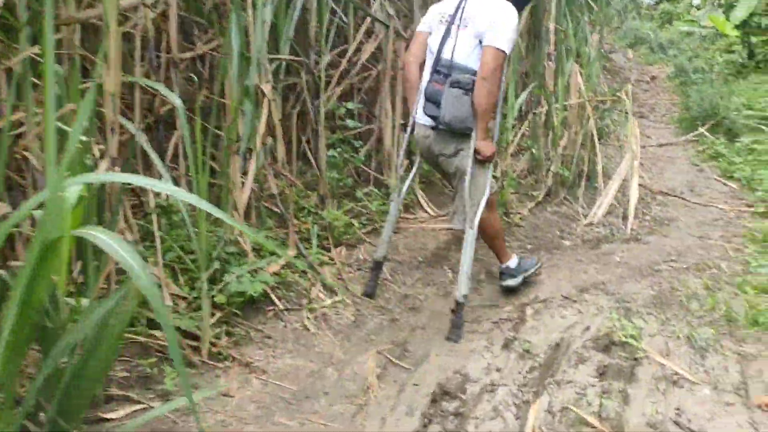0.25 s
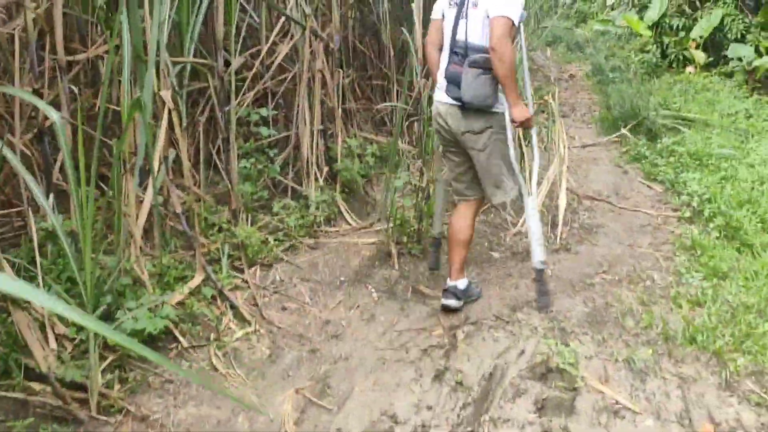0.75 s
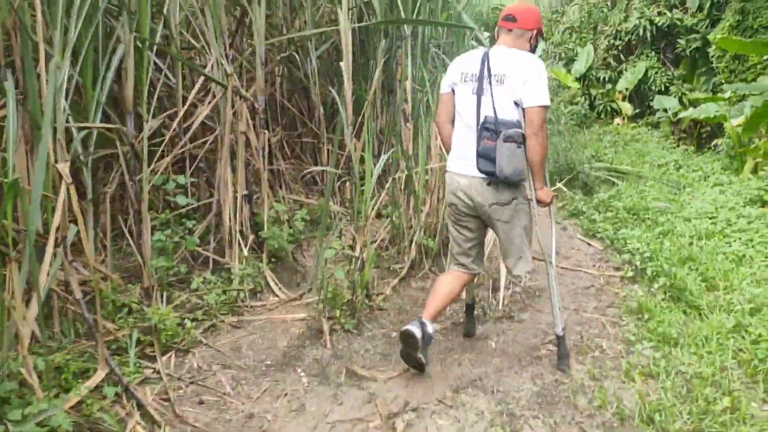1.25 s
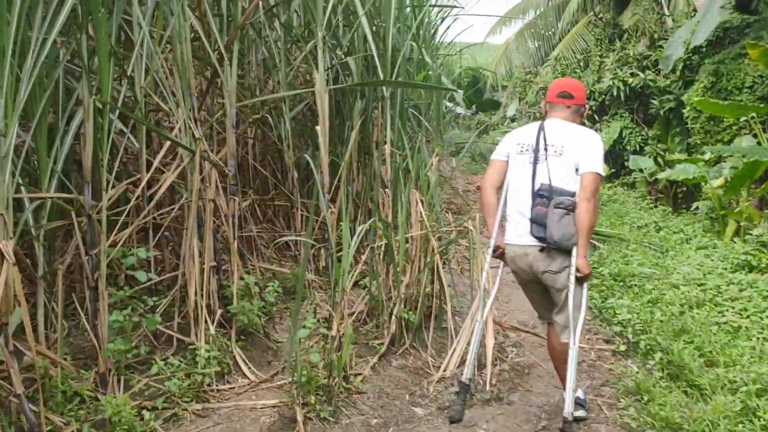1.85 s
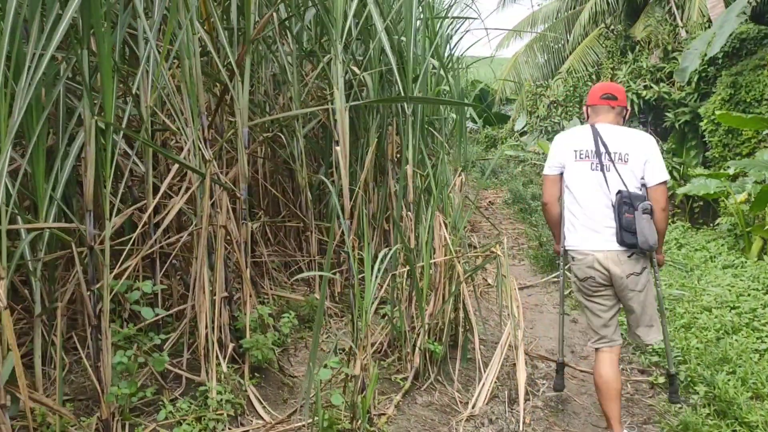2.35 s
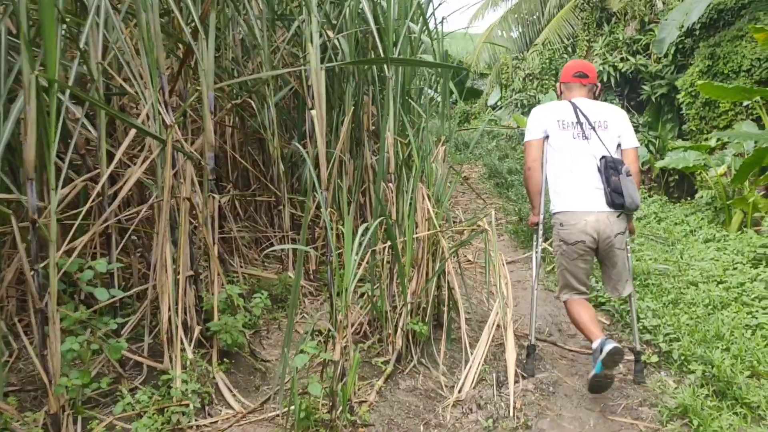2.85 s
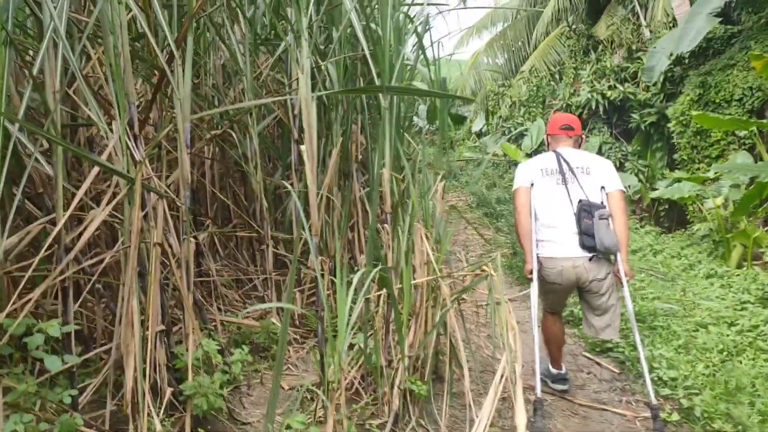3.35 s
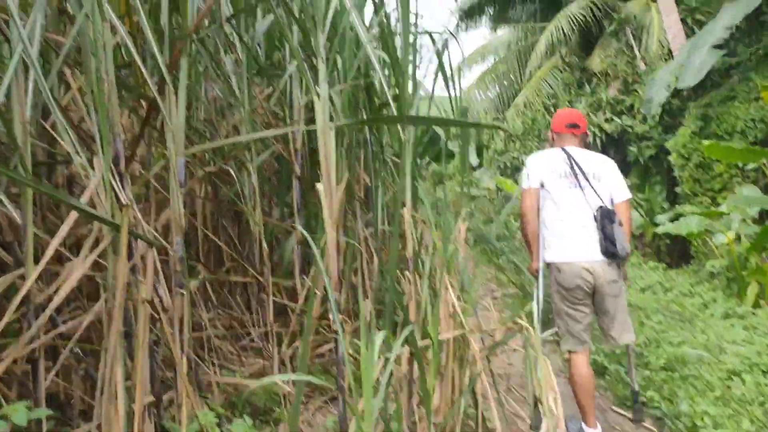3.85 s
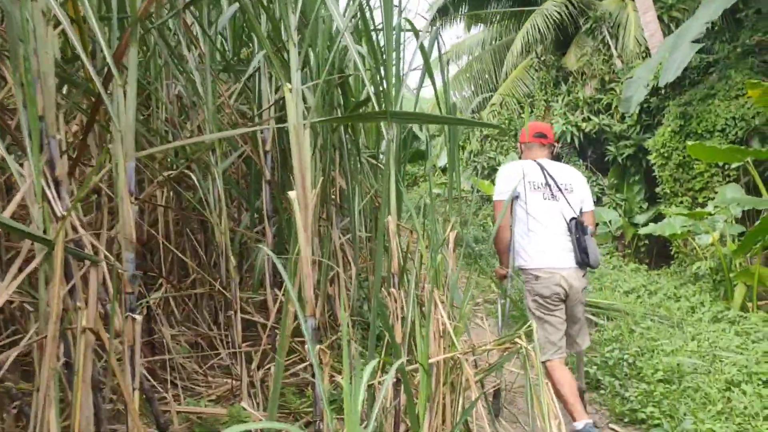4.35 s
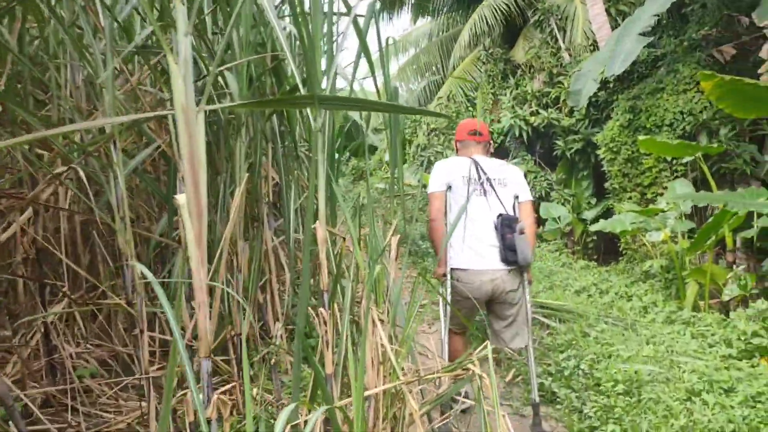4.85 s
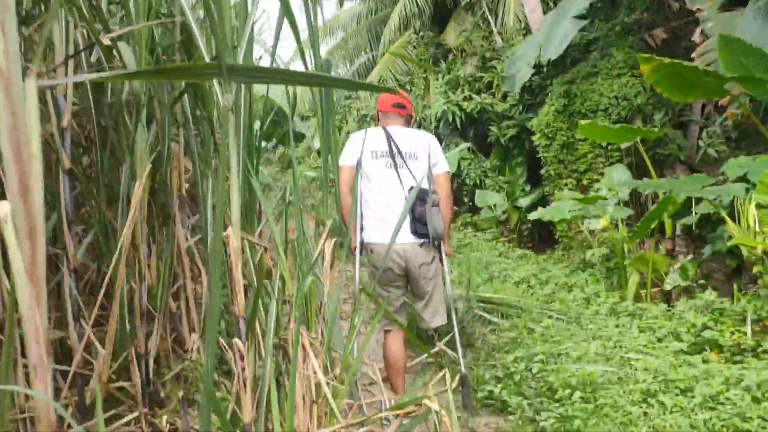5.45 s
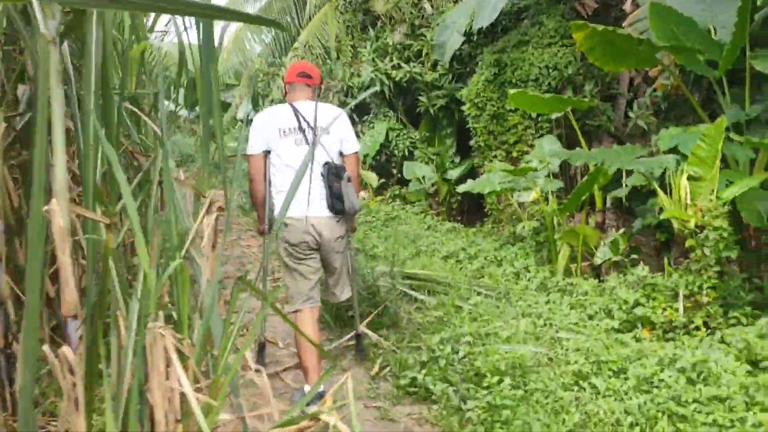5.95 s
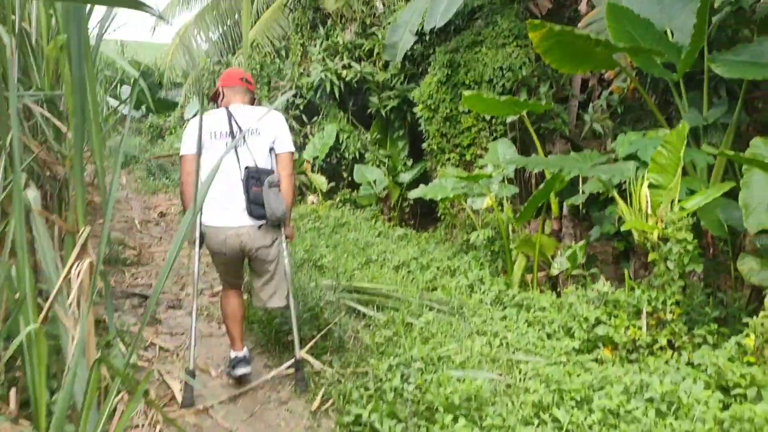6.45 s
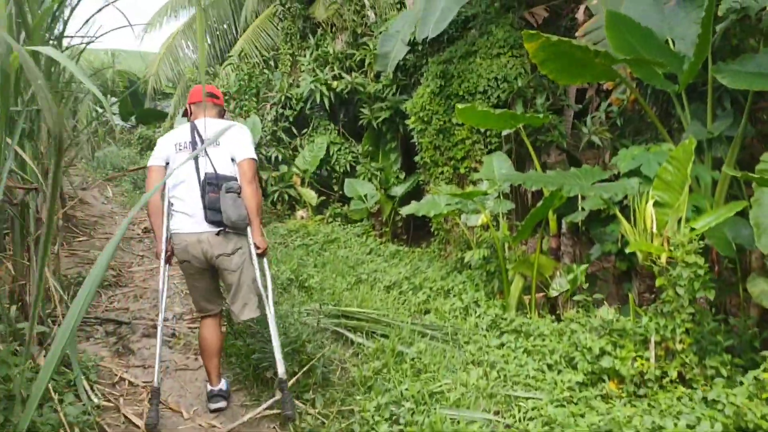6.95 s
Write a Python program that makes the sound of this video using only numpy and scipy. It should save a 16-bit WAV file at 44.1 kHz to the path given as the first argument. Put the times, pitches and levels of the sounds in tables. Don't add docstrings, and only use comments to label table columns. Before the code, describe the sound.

Someone on metal crutches walks a muddy path, crushing dry leaves and snapping stalks, over faint insect hiss and soft wind bumps.

```python
import sys
import numpy as np
from scipy import signal
from scipy.fft import rfft, irfft, next_fast_len
from scipy.io import wavfile
from scipy.ndimage import uniform_filter1d, minimum_filter1d, map_coordinates

SR = 44100
rng = np.random.default_rng(int(sys.argv[2]) if len(sys.argv) > 2 else 0)


def volts_from_decibels(level):
    exponent = np.asarray(level, float) / 20
    return 10 ** exponent


def put_to_file(sound):
    columns = np.atleast_2d(sound).T
    safe = np.clip(columns, -1, 1)
    whole_steps = np.round(safe * 32767)
    wavfile.write(sys.argv[1], SR, whole_steps.astype(np.int16))


N = 317961

# frequency in Hz, density in dB per Hz.
WASH_SPECTRUM = [(12, -15.5), (20, 0), (30, -19), (49, -15.5), (81, -13), (133, -19.5), (308, -21.5),
                 (1170, -29), (1830, -30), (5440, -35), (7390, -36), (8500, -31), (10000, -36),
                 (12900, -41.5), (15700, -35.5)]
# frequency in Hz, correlation from -1 to 1.
WASH_LIKENESS = [(60, 1), (130, 0.92), (290, 0.98), (640, 0.049), (1410, 0.088), (3100, 0.087),
                 (6820, 0.033), (15000, -0.048)]
# centre in Hz, width in Hz, level in dB.
INSECT_BANDS = [(7300, 1540, -8.5), (9600, 670, -17)]
# start in seconds, stop in seconds, pitch in Hz, level in dB.
MOTORS = [
    (0.096, 0.995, 278.3, -65.5),
    (.3, 1.446, 68.3, -61.5),
    (4.897, 6.506, 56, -60.5),
]
# time in seconds, pitch in Hz, level in dB.
BIRD_CALL = [(0.13, 997, -82), (0.164, 977, -67), (0.188, 1094, -70), (0.232, 1030, -63), (0.252, 970, -84),
             (0.28, 1041, -73)]
# frequency in Hz, density in dB per Hz.
WIND_SPECTRUM = [(8.8, -32), (15, -45), (22, -32), (40, 2.5), (60, 2.5), (122, -8.5), (184, -28),
                 (300, -25), (390, -21.5), (660, -120)]
# peak in seconds, level in dB, ms to swell or fade by 10 dB, left-right in dB.
WIND_PUFFS = [(.0, -69, 82, 3), (.2, -57, 70, 0), (.6, -69, 500, 9), (1.08, -77, 598, -4),
              (1.38, -62, 58, 0), (1.735, -49, 68, 27), (1.99, -59, 58, 21), (2.81, -69, 250, -5),
              (3.11, -60, 55, 1), (3.75, -53, 88, 1), (4.1, -71, 305, -3), (4.64, -76, 90, 0),
              (4.88, -51, 31, 8), (5.34, -51, 45, 3), (5.46, -53, 150, 2), (5.74, -49, 72, -1),
              (5.94, -50, 142, 1), (6.09, -52, 100, -4), (6.28, -44.5, 47, -8.5), (6.49, -48.5, 250, 0),
              (6.79, -47, 118, 11), (6.95, -41, 223, 1.5), (7.21, -45.5, 90, -8)]
# start in seconds, peak in dB, left-right in dB,
# centre in Hz, T60 in ms.
MUD_PATS = [(0.391, -44, 1.0, 1380, 50), (0.906, -41, 9, 944, 28), (1.114, -41.5, 0, 1490, 120),
            (1.237, -49.5, 3, 619, 45), (1.269, -50, -0.5, 797, 43), (2.622, -47, -1, 1720, 63),
            (2.963, -50, 6, 1760, 94), (3.735, -44, 0, 905, 81), (3.813, -52, 3, 676, 100),
            (3.939, -46.5, -3.0, 1330, 120), (4.073, -46.5, 1, 790, 57), (4.287, -50, 1, 566, 40),
            (4.449, -50, -2, 1610, 79), (5.974, -41, -1, 1620, 31), (5.999, -45, -2, 2720, 29),
            (6.13, -45.5, -5, 800, 51), (6.463, -43, 2, 1610, 84), (6.975, -30.5, -1, 594, 46),
            (6.995, -31.5, 4, 720, 35), (7.171, -42, 0, 800, 82), (.402, -43.5, -4, 210, 67),
            (6.866, -39.5, -1, 514, 48), (6.938, -38, -1, 560, 78)]
# start in seconds, peak in dB, left-right in dB,
# pitch in Hz, T60 in ms.
CLEAN_KNOCKS = [(1.102, -45, 0, 4300, 45), (1.1135, -23, -1, 8300, 2.5), (1.1137, -37, -1, 4300, 12),
                (1.116, -39, -1, 4400, 13), (1.1268, -21, -2, 8200, 3), (1.1288, -34, 1, 4800, 7.3),
                (1.1311, -34, 0, 3700, 2.6), (2.6188, -34, -8, 6800, 6.6), (2.619, -45.5, -2, 4000, 15),
                (2.622, -55, -1, 1440, 22), (3.1, -47, -2, 990, 3.2), (3.4, -37, 1, 400, 8.8),
                (3.815, -44.5, 0, 700, 35), (.906, -42.5, -2, 750, 22), (0.31, -45, 3, 220, 50),
                (0.27, -53, -2, 600, 10), (5.998, -32.5, 6, 3260, 9.3), (1.3, -41, -3, 14000, 35),
                (2.637, -52.5, -6, 4000, 41), (6.598, -44, 5, 14600, 8), (6.864, -36, 5, 13000, 8),
                (3.7362, -20, 1, 7800, 4.1), (5.9995, -15, 6, 11400, 2.2), (6.0007, -20.5, 0, 6840, 3.4),
                (6.0015, -23.5, -6, 7000, 21), (6.0035, -28, 4, 9900, 42)]
# frequency in Hz, width in Hz, level in dB.
TUBE_MODES = [(4760, 70, -14), (8740, 2600, 5.5), (9400, 110, -30), (9800, 130, -11), (11000, 160, -10),
              (12000, 260, 1), (13800, 120, -12)]
# start in seconds, peak in dB, left-right in dB.
PIN_PINGS = [(0.5686, -50, 0), (0.7168, -51, 4.0), (1.4152, -50, -1), (1.5454, -41, -2), (1.7464, -49, 1),
             (2.0108, -54, 22), (3.8516, -52, 12), (3.9294, -57, 4.5), (.09, -57, 0), (3.15, -54, 0),
             (3.33, -55, 0), (5.3802, -52, 3), (5.4834, -50, 0), (3.9011, -49, 6), (6.1789, -50, 4)]
# start in seconds, peak in dB, left-right in dB,
# centre in Hz, T60 in ms.
STALK_CRACKS = [
    (5.9985, -20, -1.5, 10600, 17),
    (5.9995, -14, -12, 6760, 13),
    (6, -10, 0, 7950, 9.4),
    (6.0017, -19, -14, 6050, 6.6),
    (6.003, -26, -1, 9900, 39),
    (6.008, -33, -5, 6900, 410),
]
# start in seconds, peak in dB, left-right in dB, centre in Hz.
RIB_TICKS = [(0.658, -42.5, 0, 8620), (0.9053, -46, 11, 9050), (1.018, -42, 6, 9500),
             (1.2108, -46, 8, 8860), (1.4147, -52, -5, 11000), (1.782, -46, 0, 8930),
             (2.352, -49, -1, 9250), (2.612, -46, -3, 9320), (2.627, -44, -2, 10500),
             (3.082, -41.5, 3, 8340), (3.378, -41, -5, 9100), (3.5205, -51, -1, 8400),
             (3.737, -39, 6, 12600), (5.2595, -44, -3, 9130), (5.4744, -58, -1, 8820),
             (6.597, -40, 1, 11000), (6.744, -40.5, 8, 9600), (6.695, -46, 4, 9100), (6.786, -40, 4, 10800)]
# start in seconds, peak in dB, left-right in dB, centre in Hz.
LEAF_CRUSHES = [
    (3.727, -33.5, 2, 7900),
    (3.775, -36, 2, 10000),
    (4.198, -39.5, 14, 9600),
    (4.223, -38, 5, 9900),
    (4.287, -38, -4, 8450),
]
# start in seconds, peak in dB, left-right in dB,
# centre in Hz, T60 in ms.
CRACKS_AND_CLICKS = [(.5242, -33.5, 3, 9040, 33), (1.0705, -41, 18, 9600, 21), (1.103, -36, 1, 4300, 59),
                     (1.1135, -21, -12, 7950, 3.8), (1.1149, -25, -5, 9100, 24),
                     (1.115, -33, -4, 4630, 100), (1.1264, -33, -5, 8300, 19), (2.6192, -38, -2, 7200, 86),
                     (2.619, -39.5, -2, 4230, 160), (3.732, -30.5, -6, 7300, 47),
                     (3.7359, -26, -7, 8000, 12), (3.9415, -28.5, -2, 2900, 4),
                     (5.2443, -35.5, -5, 8500, 66), (5.975, -35, -2, 4150, 36), (6.864, -34, 8, 9400, 54)]
# frequency in Hz, density in dB per Hz.
GRIT_SPECTRUM = [(120, -40), (200, -26), (310, -1), (454, -1), (995, -8.5), (2220, -4.5), (2600, -2.5),
                 (3500, -7), (4430, -2.5), (7250, -3), (9710, -3.5), (15600, -17.5)]
# time in seconds, level in dB, left-port lead in ms.
SLIDE_COURSE = [(5.62, -90, .16), (5.64, -70, .16), (5.646, -50, 0.14), (5.662, -47, 0.23),
                (5.708, -48, 0.22), (5.794, -42, 0.19), (5.918, -55, 0.16), (5.94, -64, 0.25),
                (5.97, -90, .188)]
# frequency in Hz, density in dB per Hz.
SWISH_SPECTRUM = [(1060, -38), (1800, -16.5), (2220, -9.5), (2490, -9), (2880, -6.5), (3580, -6.5),
                  (4400, -5.5), (6920, -5), (9240, 2), (11200, -7), (15600, -10.5)]
# frequency in Hz, density in dB per Hz.
SCUFF_SPECTRUM = [(120, -58), (200, -51), (225, -3), (528, -6), (1080, -6), (1360, -7.5), (1530, -5.5),
                  (3500, -9), (4550, -16), (7700, -120)]
# peak in seconds, level in dB, ms to swell by 10 dB, ms to fade by 10 dB.
LEAF_BRUSHES = [(.0, -60, 50, 150), (.42, -54, 88, 247), (.51, -56, 100, 60), (.685, -50.5, 25, 164),
                (.94, -50.5, 25, 290), (1.07, -55, 200, 83), (1.173, -52.5, 48, 66), (1.55, -51.5, 6, 15),
                (1.762, -55, 60, 28), (2.372, -56, 60, 42), (2.62, -50, 42, 100), (2.95, -55, 208, 202),
                (3.088, -54, 55, 122), (3.174, -49.5, 70, 68), (3.25, -51, 80, 383), (3.46, -62, 150, 96),
                (3.812, -54.5, 39, 158), (3.906, -58, 15, 65), (4.2, -45, 109, 88), (4.291, -51, 80, 60),
                (4.454, -52.5, 144, 150), (4.81, -56, 248, 600), (5.276, -54, 74, 220),
                (5.5, -53.5, 90, 600), (6.0, -41.5, 35, 102), (6.484, -56, 48, 30), (6.594, -54.5, 65, 75),
                (6.71, -64, 38, 143), (6.993, -33, 141, 80), (7.21, -50, 93.5, 48)]
# peak in seconds, level in dB.
SOLE_TREADS = [(.308, -67), (0.395, -67), (.51, -68), (.702, -66), (.91, -63), (1.14, -56.5), (2.384, -77),
               (2.63, -59.5), (2.808, -64), (2.964, -76), (3.174, -61), (3.71, -61), (3.812, -59),
               (3.93, -70), (4.291, -54.5), (4.437, -70), (5.27, -60), (5.6, -62), (5.92, -60.5),
               (5.978, -60), (6.484, -58), (6.74, -57), (6.8, -53), (7.21, -51.5)]
# time in seconds, share from one spot from 0 to 1,
# left-port lead in ms.
NEAR_COURSE = [(6.76, 0.27, 0.15), (6.8, 0.4, 0.22), (6.86, 0.43, 0.12), (6.95, 0.53, 0.19),
               (7.0, 0.2, 0.19), (7.08, 0.12, 0.15)]
# frequency in Hz, left-right in dB.
PORT_COLOURS = [(1500, 0), (4500, -0.5), (7000, 2), (8300, -1), (9600, 5.5), (11200, 8), (13200, -6),
                (15500, 4.5)]


def evened(x):
    return x / np.sqrt(np.mean(x ** 2) + 1e-20)


def read(points, hz):
    f, value = np.transpose(points)
    return np.interp(np.log(hz + 1), np.log(f + 1), value)


def columns(rows):
    s, *values = np.transpose(rows)
    return [np.interp(np.arange(N) / SR, s, v) for v in values]


def colour(x, points):
    size = next_fast_len(N, True)
    gain = volts_from_decibels(read(points, np.fft.rfftfreq(size, 1 / SR)))
    return evened(irfft(rfft(x, size) * gain, size)[..., :N])


def resonate(x, hz, width_hz):
    b, a = signal.iirpeak(hz, hz / width_hz, SR)
    return signal.lfilter(b, a, x)


def highpass(x, order, hz):
    return signal.lfilter(*signal.butter(N=order, Wn=hz, btype="high", fs=SR), x)


def sides(pan_db):
    return volts_from_decibels(np.array([pan_db / 2, -pan_db / 2]))


def add(mix, s, sound):
    part = mix[:, max(round(s * SR), 0):][:, :sound.shape[1]]
    part += sound[:, :part.shape[1]]


def add_burst(mix, s, db, pan_db, sound):
    add(mix, s - 0.010, volts_from_decibels(db) * sides(pan_db)[:, None] * sound / abs(sound).max())


def burst(noise, rise_ms, t60_ms):
    ms = np.arange(noise.shape[-1]) * 1000 / SR - 10
    return noise * np.where(ms < 0, np.exp(ms / max(rise_ms, .1)), volts_from_decibels(-60 * ms / t60_ms))


def swells(s, db, swell_ms, fade_ms):
    ms = np.arange(N * 1000 // SR + 2) - 1000 * np.array(s)[:, None]
    swell_ms, fade_ms = np.asarray(swell_ms)[..., None], np.asarray(fade_ms)[..., None]
    away = np.where(ms < 0, -ms / swell_ms, ms / fade_ms)
    return volts_from_decibels(np.array(db)[:, None] - 10 * away) ** 2


def stretched(steps):
    return np.interp(np.arange(N) * 1000 / SR, np.arange(len(steps)), steps)


def crackle(per_s, spread_db):
    size = volts_from_decibels(spread_db * np.minimum(rng.exponential(1, N), 4))
    return size * (rng.random(N) < per_s / SR) * rng.standard_normal(N)


def from_left(x, lead_ms):
    late = np.arange(N) - lead_ms * SR / 1000
    return np.array([x, map_coordinates(x, [late], order=5, mode="nearest")])


def bounced(x, ms, share):
    return signal.lfilter(np.r_[1, np.zeros(round(ms * SR / 1000) - 1), share], 1, x)


def wash():
    level_db, patch_db = -54, 0.82
    frames, hz = N // 256 + 5, np.fft.rfftfreq(1024, 1 / SR)
    a, b, c, d, patches = rng.standard_normal((frames, 513, 5)).T
    patches = evened(uniform_filter1d(uniform_filter1d(patches, size=12, axis=0), size=14, axis=1))
    same = read(WASH_LIKENESS, hz)[:, None]
    left = a + 1j * b
    right = same * left + np.sqrt(1 - same ** 2) * (c + 1j * d)
    z = np.array([left, right]) * volts_from_decibels(read(WASH_SPECTRUM, hz)[:, None] + patch_db * patches)
    return volts_from_decibels(level_db) * evened(signal.istft(z, nperseg=1024, noverlap=768)[1][:, :N])


def chorus():
    level_db, pan_db = -61, -7.0
    noise = rng.standard_normal((2, N))
    bands = sum(volts_from_decibels(db) * resonate(resonate(noise, hz, w), hz, w) for hz, w, db in INSECT_BANDS)
    return volts_from_decibels(level_db) * evened(bands) * sides(pan_db)[:, None]


def hum():
    waver_db, fade_s = 2, .06
    t = np.arange(N) / SR
    start, stop, hz, db = np.transpose(MOTORS)[..., None]
    fade = np.clip(np.minimum(t - start, stop - t) / fade_s, 0, 1)
    waver = evened(uniform_filter1d(rng.standard_normal((N, len(MOTORS))).T, size=4000))
    drones = volts_from_decibels(db + waver_db * waver) * fade * np.sin(2 * np.pi * hz * t)
    return np.sqrt(2) * drones.sum(0)


def bird():
    hz, level_db = columns(BIRD_CALL)
    t = np.arange(N) / SR
    fade = np.clip(np.minimum(t - BIRD_CALL[0][0], BIRD_CALL[-1][0] - t) / 0.023, 0, 1)
    return np.sqrt(2) * volts_from_decibels(level_db) * fade * np.sin(2 * np.pi * np.cumsum(hz) / SR)


def wind():
    level_db, breeze_db, shared = -2.0, -84, .55
    s, db, ms, pan_db = np.transpose(WIND_PUFFS)
    port_power = sides(pan_db) ** 2 @ swells(s, db, ms, ms) + volts_from_decibels(breeze_db) ** 2
    a, b = (colour(rng.standard_normal(N), WIND_SPECTRUM) for _ in "ab")
    push = np.array([a, shared * a + np.sqrt(1 - shared ** 2) * b])
    return volts_from_decibels(level_db) * np.array([stretched(np.sqrt(power)) for power in port_power]) * push


def cane(x):
    per_s, t60_s, first_s = 2500, 0.16, .004
    t = np.arange(9000) / SR
    taps = rng.choice([-1., 1.], (2, len(t))) * (rng.random((2, len(t))) < per_s / SR)
    taps *= volts_from_decibels(-60 * t / t60_s) * (t > first_s)
    return signal.fftconvolve(x, taps / np.linalg.norm(taps[0]), axes=1)[:, :N]


def pats():
    out = np.zeros((2, N))
    for s, db, pan_db, hz, t60_ms in MUD_PATS:
        a, b, c = rng.standard_normal((3, 6000))
        puff = burst(a + 0.7 * np.array([b, c]), 1.5, t60_ms)
        add_burst(out, s, db, pan_db, resonate(puff, hz, 0.35 * hz))
    return out


def knocks():
    out, t = np.zeros((2, N)), np.arange(4000) / SR
    for s, db, pan_db, hz, t60_ms in CLEAN_KNOCKS:
        ring = volts_from_decibels(db - 60000 * t / t60_ms) * np.sin(2 * np.pi * hz * t)
        add(out, s, sides(pan_db)[:, None] * ring)
    return out


def crutch(blows):
    ring_db, pin_hz, pin_width_hz = -5.5, 12080, 450
    out = volts_from_decibels(ring_db) * sum(volts_from_decibels(db) * resonate(blows, hz, width) for hz, width, db in TUBE_MODES)
    for s, db, pan_db in PIN_PINGS:
        ping = burst(rng.standard_normal((2, 3000)), 1.5, 45)
        ping = resonate(resonate(ping, pin_hz, pin_width_hz), pin_hz, pin_width_hz)
        add_burst(out, s, db, pan_db, ping)
    return out


def snaps(rows, bounce_ms, bounce):
    out = np.zeros((2, N))
    for s, db, pan_db, hz, rise_ms, t60_ms in rows:
        a, b, c = rng.standard_normal((3, 6000))
        crack = burst(0.16 * a + 2.4 * np.array([b, c]), rise_ms, t60_ms)
        width_hz = 0.46 * hz + 32000 / t60_ms
        crack = resonate(resonate(crack, hz, width_hz), hz, width_hz)
        crack = crack + 0.24 * np.diff(crack, prepend=0)
        add_burst(out, s, db, pan_db, crack)
    return bounced(out, bounce_ms, bounce)


def stalk():
    rise_ms, bounce_ms, hollow_hz = .8, .24, 4170
    cracks = snaps([(*row, rise_ms, t60_ms) for *row, t60_ms in STALK_CRACKS], bounce_ms, -0.27)
    light = .25 * cracks + highpass(cracks, 3, 4700)
    return light - resonate(light, hollow_hz, 1200)


def small_breaks():
    tick_rise_ms, tick_t60_ms = 1.3, 100
    crush_rise_ms, crush_t60_ms = 4, 33
    rise_share, slowest_rise_ms = 0.024, 1.5
    rows = [(*row, tick_rise_ms, tick_t60_ms) for row in RIB_TICKS]
    rows += [(*row, crush_rise_ms, crush_t60_ms) for row in LEAF_CRUSHES]
    for *row, t60_ms in CRACKS_AND_CLICKS:
        rows.append((*row, min(rise_share * t60_ms, slowest_rise_ms), t60_ms))
    return snaps(sorted(rows, key=lambda row: row[0]), .48, 0.086)


def slide():
    gain_db, stutter_db, bounce_ms = 4.0, 0.38, .48
    level_db, lead_ms = columns(SLIDE_COURSE)
    stutter = evened(uniform_filter1d(rng.standard_normal(N), size=350))
    grit, *scattered = (colour(crackle(per_s=13000, spread_db=-0.5), GRIT_SPECTRUM) for _ in "abc")
    treble = highpass(scattered, 2, 7000)
    both = from_left(grit, lead_ms) + 1.1 * treble + .8 * np.array(scattered)
    return volts_from_decibels(level_db + gain_db + stutter_db * stutter) * evened(bounced(both, bounce_ms, .22))


def leaves():
    stir_db = -71
    tread_swell_ms, tread_fade_ms, scuff_under_db = 57, 32, -14
    brush = swells(*np.transpose(LEAF_BRUSHES)).sum(0) + volts_from_decibels(stir_db) ** 2
    tread = swells(*np.transpose(SOLE_TREADS), tread_swell_ms, tread_fade_ms).sum(0)
    tread = tread + volts_from_decibels(scuff_under_db) ** 2 * brush
    flutter = evened(uniform_filter1d(rng.standard_normal(N), size=400))
    near, lead_ms = columns(NEAR_COURSE)
    swish = np.array([crackle(per_s=14000, spread_db=-2.0) for _ in "LR"])
    swish = colour(swish, SWISH_SPECTRUM)
    dull = signal.filtfilt(*signal.butter(N=3, Wn=4500, fs=SR), from_left(swish[0], lead_ms) - swish)
    swish = swish + near * dull
    scuff, *loose = (colour(crackle(per_s=3000, spread_db=1.5), SCUFF_SPECTRUM) for _ in "abc")
    scuff = 0.8 * from_left(scuff, lead_ms) * (1 + near / 2) + 1.04 * (1 - near) * np.array(loose)
    swish = stretched(np.sqrt(brush)) * volts_from_decibels(1.02 * flutter) * swish
    return swish + stretched(np.sqrt(tread)) * volts_from_decibels(2.3 * flutter) * scuff


def scene():
    cane_db = -7.5
    background = wash() + chorus() + hum() + bird() + wind()
    small = small_breaks()
    hits = pats() + knocks() + crutch(small) + stalk() + small
    return background + hits + volts_from_decibels(cane_db) * cane(hits) + slide() + leaves()


def thin_treble(z, hz, t, dry):
    top_hz = 15800
    power = (abs(z) ** 2).mean(0) + 1e-20
    near = uniform_filter1d(uniform_filter1d(power, size=5, axis=0), size=3, axis=1)
    contrast_db = 10 * np.log10(near / uniform_filter1d(near, size=60, axis=0))
    change_db = np.clip(np.where(contrast_db < 0, 8., 1.0) * contrast_db, -40, 4)
    change_db *= np.clip((hz[:, None] - 1300) / 1200, 0, 1) + .45 * (hz[:, None] > 10500)
    edge = uniform_filter1d((np.diff(dry, prepend=0) ** 2).mean(0), size=128) + 1e-20
    crest = -minimum_filter1d(-edge, size=1800) / uniform_filter1d(edge, size=1800)
    steady = np.clip((8 - 10 * np.log10(crest)) / 3, .1, 1)
    change_db *= np.interp(t, np.arange(N) / SR, steady)
    before = uniform_filter1d(power, size=60, axis=0)
    after = uniform_filter1d(power * volts_from_decibels(2 * change_db), size=60, axis=0)
    return z * volts_from_decibels(change_db) * np.sqrt(before / after) * (hz < top_hz)[:, None]


def drop_weaker(z, hz):
    weaker_db = 4.2
    pair = np.array([z[0] + z[1], z[0] - z[1]]) / 2
    band = uniform_filter1d(uniform_filter1d(abs(pair) ** 2, size=10, axis=1), size=3, axis=2) + 1e-20
    under_db = 10 * np.log10(band[::-1] / band) - weaker_db
    pair = pair * np.where(hz[:, None] > 2300, np.clip(1 - under_db / 1.5, .02, 1), 1)
    return np.array([pair[0] + pair[1], pair[0] - pair[1]])


def low_pass(x):
    return signal.sosfilt(signal.butter(12, 16810, fs=SR, output="sos"), x)


def record(dry):
    offset = .0028
    hz, t, z = signal.stft(dry, SR, nperseg=2048, noverlap=1536)
    z = z * sides(read(PORT_COLOURS, hz))[..., None]
    z = drop_weaker(thin_treble(z, hz, t, dry), hz)
    mix = signal.istft(z, SR, nperseg=2048, noverlap=1536)[1][:, :N] + offset
    return low_pass(mix)


dry = scene()
out = record(dry)
put_to_file(out)
```